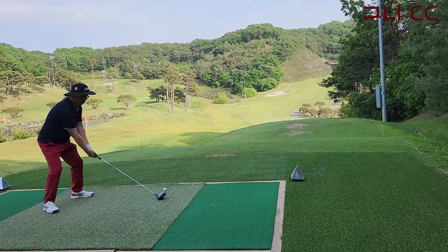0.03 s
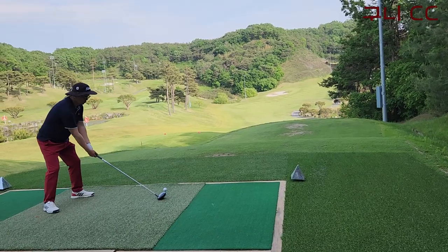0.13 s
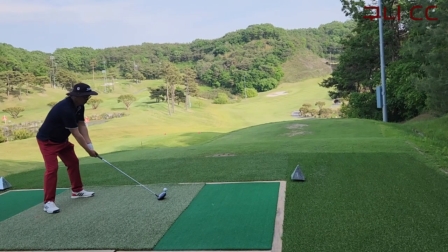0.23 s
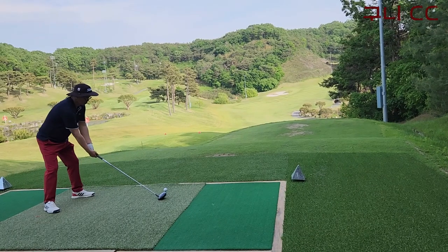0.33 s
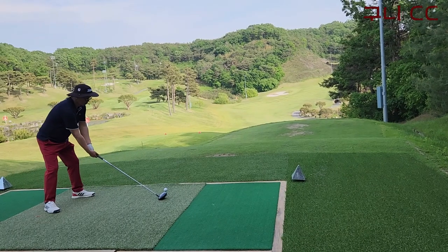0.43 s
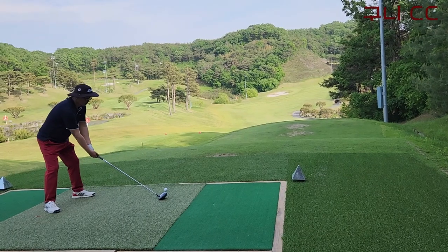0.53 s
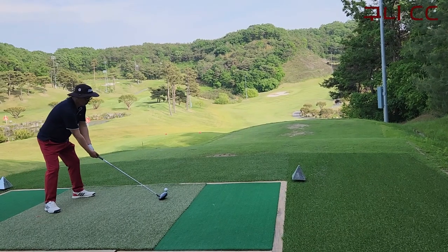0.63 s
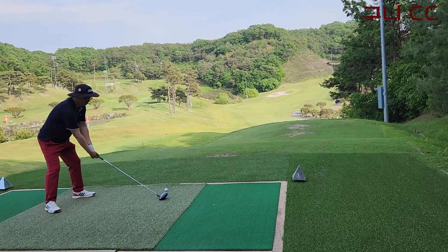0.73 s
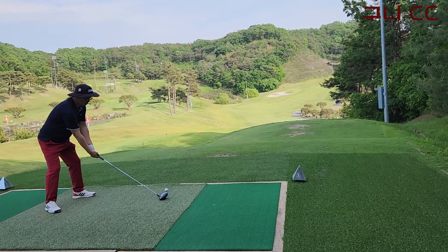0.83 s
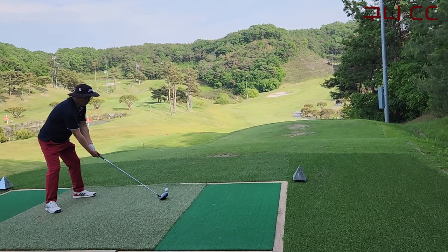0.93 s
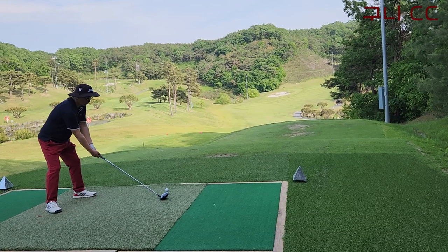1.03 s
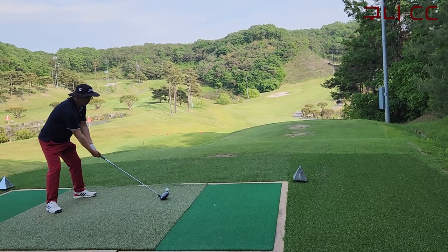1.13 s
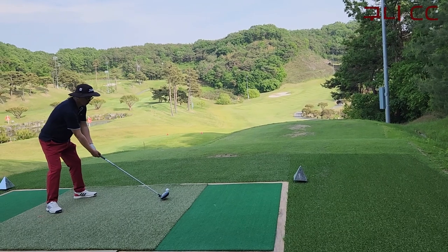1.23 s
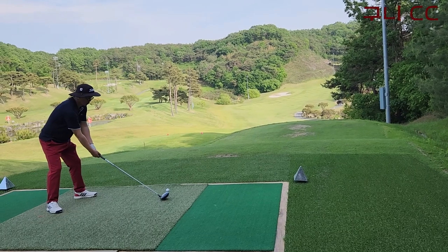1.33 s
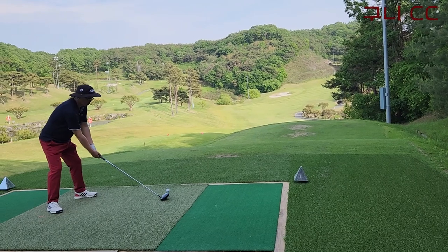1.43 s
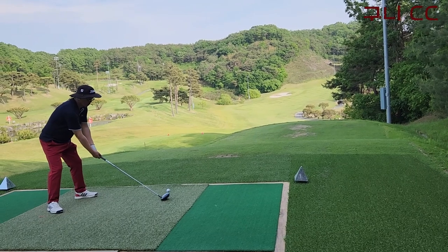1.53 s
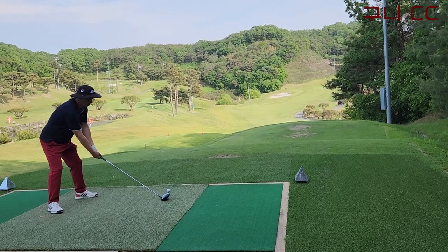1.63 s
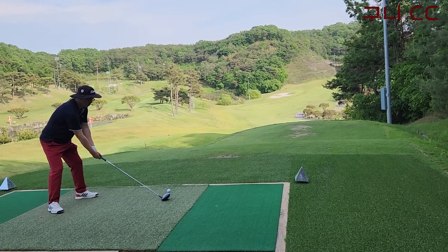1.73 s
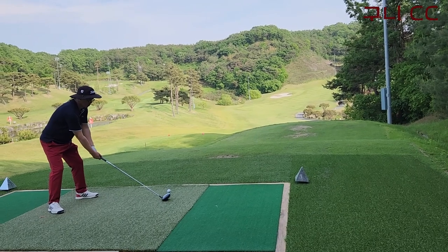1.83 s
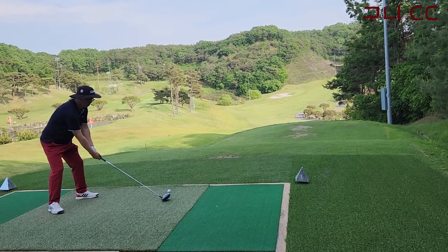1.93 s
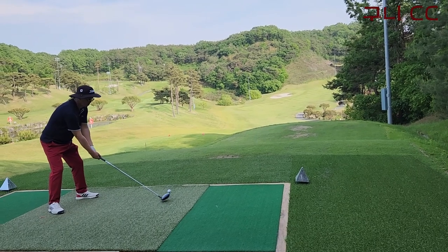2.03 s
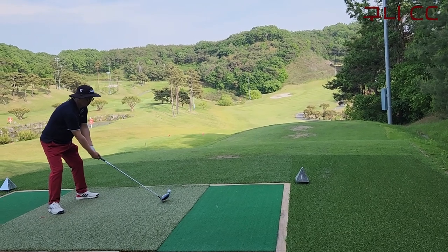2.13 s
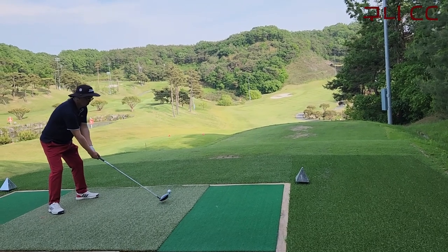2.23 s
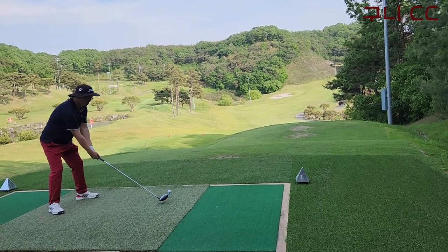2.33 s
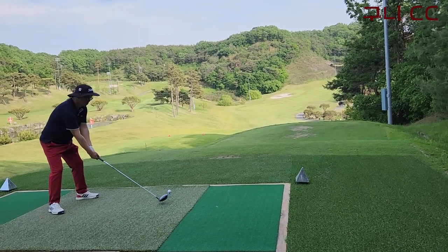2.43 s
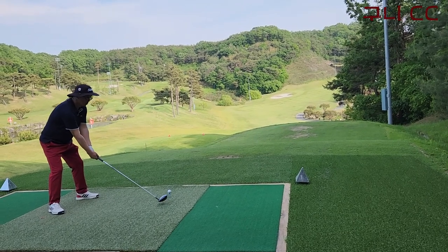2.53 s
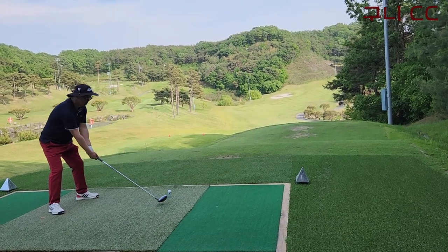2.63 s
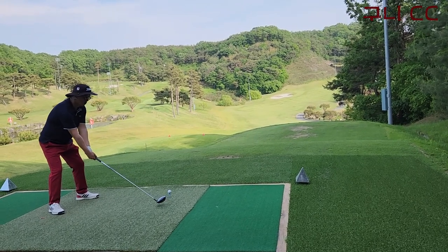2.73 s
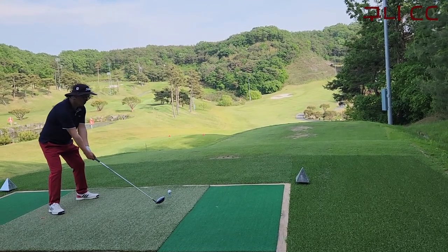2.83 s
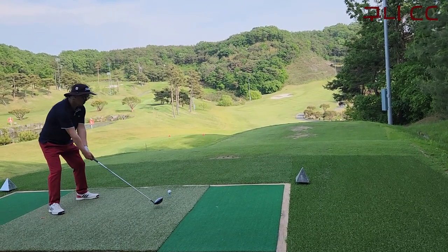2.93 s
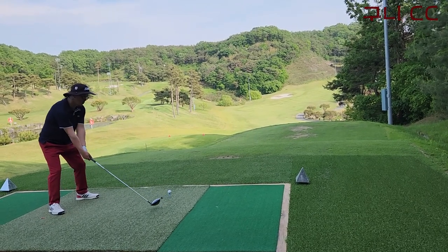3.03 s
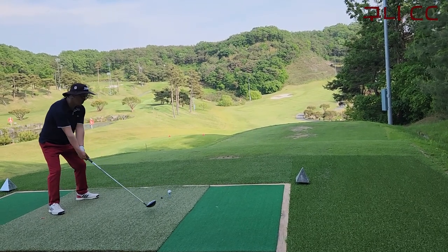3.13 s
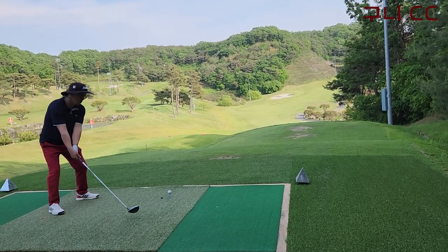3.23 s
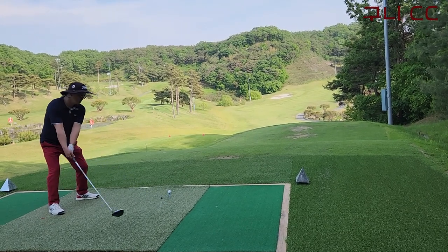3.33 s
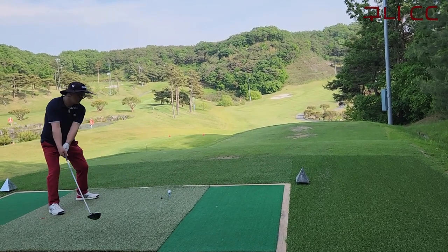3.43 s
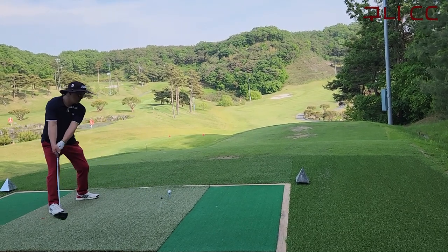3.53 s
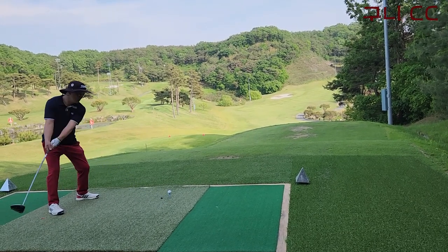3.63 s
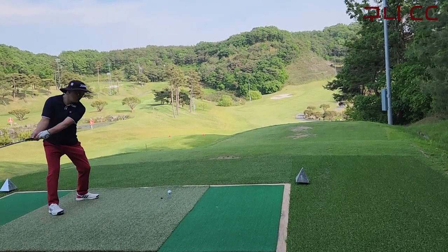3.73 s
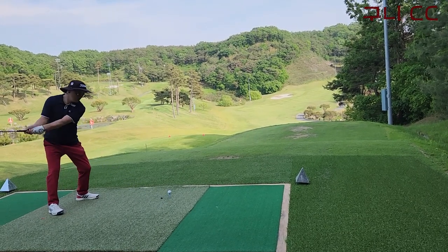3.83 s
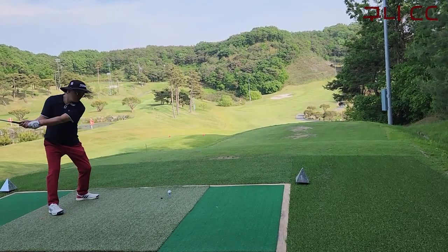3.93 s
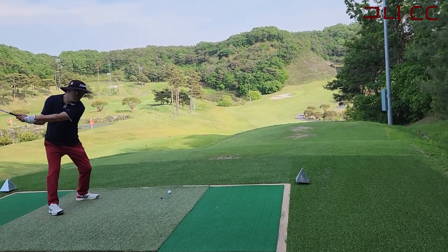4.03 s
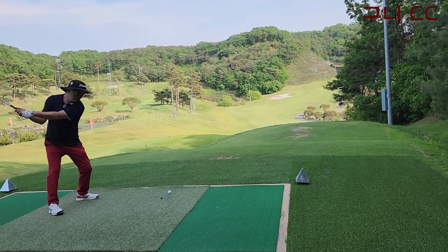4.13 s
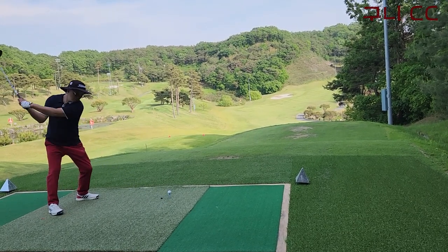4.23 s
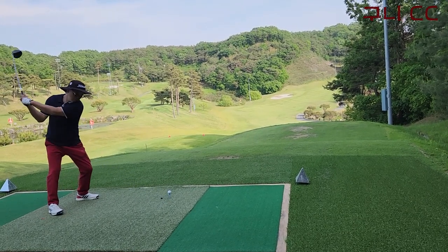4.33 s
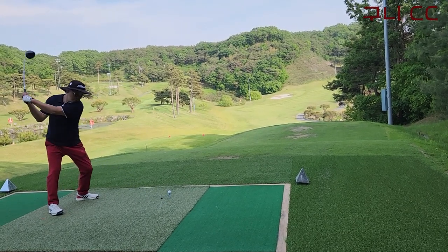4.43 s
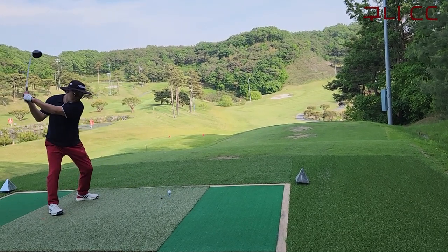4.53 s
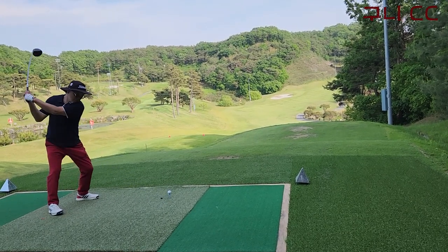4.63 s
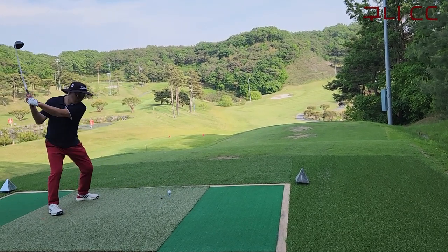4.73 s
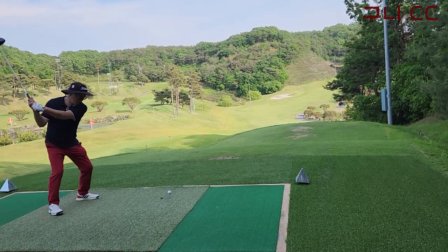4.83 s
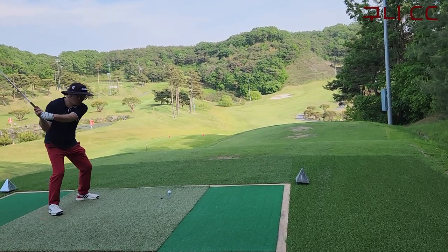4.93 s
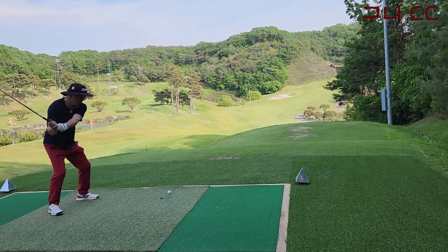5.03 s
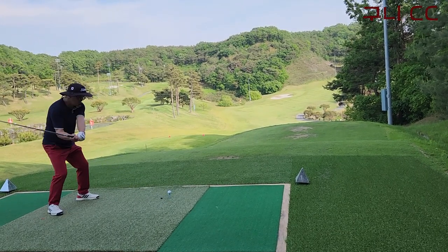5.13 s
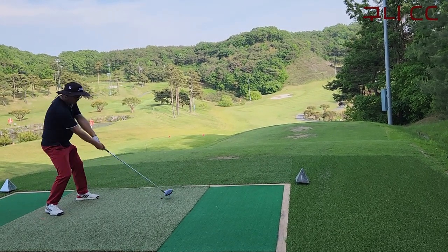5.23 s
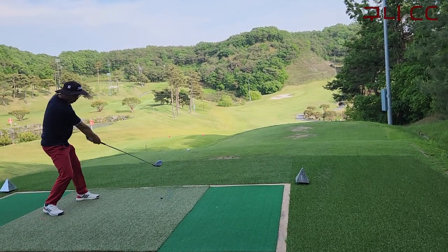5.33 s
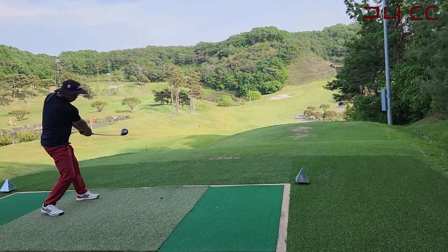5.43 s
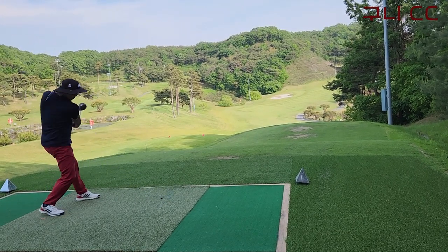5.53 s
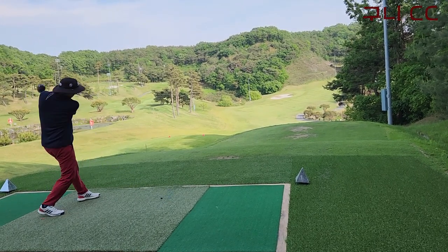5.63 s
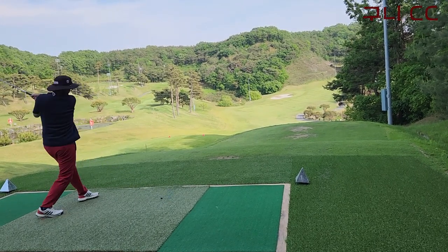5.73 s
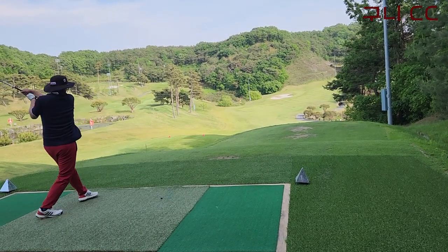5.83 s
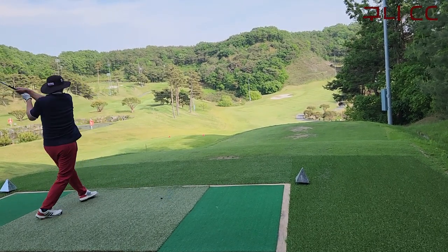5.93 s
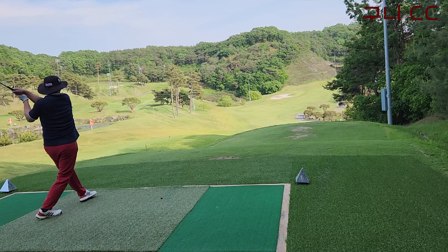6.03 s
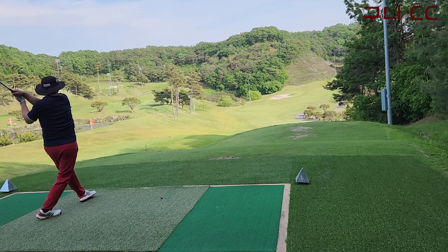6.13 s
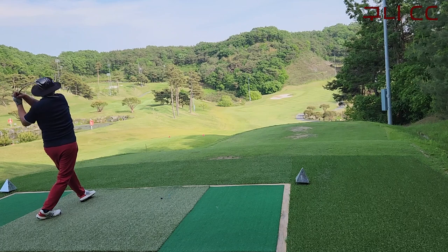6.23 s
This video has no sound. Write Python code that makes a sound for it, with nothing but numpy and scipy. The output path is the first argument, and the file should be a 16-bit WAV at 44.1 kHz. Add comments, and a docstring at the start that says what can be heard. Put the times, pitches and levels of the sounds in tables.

```python
"""Golf drive on a wooded course

A pair of microphones by a practice mat. The club whooshes down and its hollow metal head cracks against
the ball; a slap comes back from close by and the trees scatter a tail. A few soft knocks fall around
the swing. Behind it all, a hiss with a low hum gives way abruptly to quiet open air."""
import sys
import numpy as np
from scipy import signal
from scipy.fft import rfft, irfft, next_fast_len
from scipy.io import wavfile
from scipy.ndimage import uniform_filter1d, minimum_filter1d

SR = 44100
rng = np.random.default_rng(int(sys.argv[2]) if len(sys.argv) > 2 else 0)


def transcribe(signal):
    """Save signal, clipped to [-1, 1], as a 16-bit WAV file at the path in sys.argv[1]."""
    frames = np.atleast_2d(signal).T
    limited = np.clip(frames, -1, 1)
    pcm = np.round(limited * 32767).astype(np.int16)
    wavfile.write(sys.argv[1], SR, pcm)


N = 276727
IMPACT_S = 5.2757


def crack(spray_db=-12, spray_t60=0.1):
    """The squashed ball knocks first, then a spray of dense, short modes bursts out."""
    # The ball's knock. Each row: pitch in Hz, level in dB, t60 in seconds, left over right in dB.
    ball_modes = [(310, -6.5, 0.03, 4.5), (378, -13, .03, 2.5), (530.7, -10.5, 0.045, 7.5)]
    # Each row: frequency in Hz, relative level of the spray in dB.
    spectrum = [(88, -45), (150, -9.5), (547, -20.5), (920, -12), (1450, -19), (1680, -17.5), (2690, -9.5),
                (3190, -4.5), (3410, -12.5), (6900, -13), (8300, -34.5), (10800, -60.5), (18300, -120)]
    # Each row: frequency in Hz, left over right in dB.
    balance = [(60, 0.5), (100, -2), (180, 5.5), (310, -4.5), (540, 0.5), (940, 6), (1640, 4), (2850, -0.5),
               (4940, 0), (8570, 5.5)]
    age = clock() - IMPACT_S
    out = from_db(spray_db) * stereo_noise(spectrum, balance) * struck(age - .0007, spray_t60, .0008)
    for hz, db, t60, side_db in ball_modes:
        out += from_db(db) * pan(side_db) * struck(age, t60, .00066) * np.cos(2 * np.pi * hz * age)
    return out


def head_ring(strength_db=2.5, build_s=.0007):
    """The hollow metal head's modes build up as the ball leaves the face."""
    # Each row: pitch in Hz, relative level in dB, t60 in seconds, left over right in dB.
    modes = [(820, -28.0, 0.139, 7.0), (1262, -25.0, 0.093, 5.0), (1460, -14.0, 0.121, 5.0),
             (1975, -21.0, 0.121, -1.0), (2105, -20.0, 0.134, -3.0), (2360, -23.0, 0.19, -1.0),
             (2460, -23.0, 0.19, 2.0), (2748, -12.0, 0.09, -3.0), (2980, -19.0, 0.133, -4.0),
             (3455, -22.0, 0.105, -9.0), (4035, -27.0, 0.112, 0.0), (4235, -24.0, 0.122, 3.0),
             (4600, -25.0, 0.106, 1.0), (4780, -26.0, 0.13, -0.0), (5262, -24.0, 0.087, 5.0),
             (5562, -23.0, 0.072, 9.0), (5768, -24.0, 0.074, 12.0), (6290, -31.0, 0.162, 8.0),
             (6795, -28.0, 0.078, 7.0), (7760, -40.0, 0.161, 4.0)]
    age, out = clock() - IMPACT_S, 0
    for hz, db, t60, side_db in modes:
        phase = rng.random((2, 1))   # each microphone meets the mode at a phase of its own
        tone = np.sin(2 * np.pi * (hz * age + phase))
        out += from_db(db) * pan(side_db) * struck(age - .0007, t60, build_s) * tone
    return from_db(strength_db) * out


def swish(head_hz=278.6, shaft_hz=6000, up_to_speed_s=5.122, whip_s=0.072, whip_db=18):
    """The thick head sheds slow eddies, the thin shaft fast ones; edges sing just before the ball."""
    # Each row: pitch in Hz, width in Hz, level over the rush in dB, left over right in dB.
    edge_tones = [(2750, 150, -5, -3), (3380, 220, -2, -12), (5060, 50, -4.5, 12), (6550, 70, -15, 14)]
    t = clock()
    swell_db = -328 * np.clip(up_to_speed_s - t, 0, 1)   # these three slopes are in dB per second
    sag_db = -22 * np.clip(t - up_to_speed_s, 0, 1)
    fade_db = -400.5 * np.clip(t - IMPACT_S, 0, 1)
    whip = ramp(IMPACT_S - whip_s, whip_s)   # the wrists release and whip the head through
    whoosh = wavering_tone(head_hz, width_hz=90)
    whoosh += from_db(-16) * wavering_tone(1.8 * head_hz, width_hz=116)
    sizzle = np.array([wavering_tone(shaft_hz, width_hz=2000) for side in range(2)])
    edges = sum(from_db(db) * pan(side_db) * wavering_tone(hz, width_hz, flutter=0.61)
                for hz, width_hz, db, side_db in edge_tones)
    # Each row: frequency in Hz, relative level of the rushing air in dB.
    spectrum = [(240, -32.5), (400, -7.5), (570, -4), (715, -19), (812, -13), (1430, -12.5), (2700, -16),
                (3890, -25.5), (5010, -19.5), (8200, -34.5), (10700, -64.5), (18000, -120)]
    rush = from_db(-48.5 + whip_db * whip) * (stereo_noise(spectrum) + whip * edges)
    club = from_db(-36 + sag_db) * whoosh + from_db(-55.5) * sizzle + rush
    return from_db(swell_db + fade_db) * club


def shaft_whistles(width_s=.014, octaves_per_s=5):
    """Each whistle swells and fades while its pitch climbs with the speed of the shaft."""
    # Each row: loudest moment in seconds, pitch there in Hz, level in dB.
    whistles = [(5.127, 4720, -50), (5.150, 5550, -54), (5.200, 5040, -55)]
    out = 0
    for peak_s, hz, db in whistles:
        age = np.clip(clock() - peak_s, -.1, .1)
        pitch = hz * 2 ** (octaves_per_s * age)
        tone = np.array([wavering_tone(pitch, width_hz=320, flutter=.8) for side in range(2)])
        out += from_db(db) * np.exp(-.5 * (age / width_s) ** 2) * tone
    return out


def echoes(ring, click_db=20, ring_db=-8, slap_s=.053, slap_width_s=.008, tail_s=.045):
    """A smeared slap from close by, then scatter from the trees: a click tinged with the head's ring."""
    # Each row: band centre in Hz, slap in dB, tail in dB, tail t60 in seconds, left over right in dB.
    bands = [(60, -12.5, -14, 0.49, -1.5), (290, -1, -4, .7, 2.5), (560, 4, -3.5, 1, 2),
             (850, -2, -1, .7, 0), (1126, -9.5, -4.5, 0.53, -4), (1540, 3, 1.5, 0.71, -2.5),
             (1780, -9.5, -8, 0.65, -1), (2270, 6, 4, 0.7, -2.5), (2900, -0.5, -0.5, 0.61, -1),
             (3496, -12, -3, 0.45, 0), (4200, -12.5, -9.5, 0.48, 7), (6000, -13.5, -5.5, 0.33, 6.5),
             (8040, -17, -25, .47, 10)]
    sent = from_db(ring_db) * ring + from_db(click_db) * (np.arange(N) == round(IMPACT_S * SR))
    t = np.arange(SR) / SR
    hz = np.arange(SR // 2 + 1)
    scatter = rfft(stereo_noise([(1000, 0)], lag_s=.0002)[:, :SR])
    slap = rms_one(np.exp(-.5 * ((t - slap_s) / slap_width_s) ** 2))
    response = 0
    for centre_hz, slap_db, tail_db, t60, side_db in bands:
        share = at_hz([(band[0], band[0] == centre_hz) for band in bands], hz)
        near = struck(t - tail_s, t60, rise_s=.015)
        far = from_db(-23) * struck(t - tail_s, 2.34 * t60, rise_s=.05)   # distant slopes answer
        tail = rms_one(np.hypot(near, far))
        envelope = np.hypot(from_db(slap_db) * slap, from_db(tail_db) * tail)
        response += irfft(scatter * share, SR) * envelope * pan(side_db) / np.sqrt(SR)
    return signal.fftconvolve(sent, response, axes=1)[:, :N]


def knocks():
    """Dull, quickly damped bumps with one weaker overtone, dead centre."""
    # Each row: start in seconds, level in dB, pitch in Hz, t60 in seconds.
    bumps = [(4.712, -39.5, 302, 0.057), (5.705, -43, 310, 0.041), (5.876, -42, 328, 0.042),
             (6.144, -46.5, 300, 0.065), (6.240, -42.5, 775, 0.032)]
    out = np.zeros(N)
    for start_s, db, hz, t60 in bumps:
        age = clock() - start_s
        body = np.sin(2 * np.pi * hz * age) + from_db(-7) * np.sin(2 * np.pi * 1.8 * hz * age)
        out += from_db(db) * struck(age, t60, rise_s=0.00094) * body
    return out


def hiss_and_hum(hiss_db=-51.5, drone_db=-51):
    """A steady hiss over a low drone and a few humming tones."""
    # Each row of both: frequency in Hz, relative level in dB.
    hiss_spectrum = [(300, -39), (480, -13.5), (800, -9), (1100, -8.5), (1500, -3), (2000, -2.5),
                     (2450, 3.5), (3000, -4), (4200, -11), (5500, -9.5), (6400, -11.5), (7500, -11.5),
                     (9000, -24), (11700, -27), (13000, -70)]
    drone_spectrum = [(20, -20), (40, -16), (55, 0.5), (85, -7), (115, -1.5), (140, -9.5), (175, -3),
                      (235, -7.5), (300, -19.5), (360, -19.5), (410, -13.5), (470, -43.5), (700, -64)]
    # Each row: frequency in Hz, left over right in dB.
    balance = [(60, 1), (100, 1), (180, 2), (310, -3.5), (540, 5.5), (940, 0.5), (1640, -4), (2850, -4.5),
               (4940, 1), (8570, -3)]
    # Each row: pitch in Hz, rms level in dB.
    tones = [(59.2, -58.5), (118.4, -54), (605, -77.5)]
    t = clock()
    hum = sum(from_db(db) * np.sqrt(2) * np.sin(2 * np.pi * (hz * t + rng.random())) for hz, db in tones)
    hiss = from_db(hiss_db) * stereo_noise(hiss_spectrum, balance, lag_s=0.000548)
    drone = from_db(drone_db) * stereo_noise(drone_spectrum, balance)
    return hiss + drone + hum


def open_air(air_db=-52, rumble_db=-50, boom_db=-57, level_drop_db=-3.5):
    """Quiet air over a low rumble; the whole background turns down a few dB shortly after the stroke."""
    # Each row of both: frequency in Hz, relative level in dB.
    air_spectrum = [(150, -39), (250, -15), (290, -10.5), (378, -12), (555, -6), (734, -7.5), (986, -3),
                    (1180, -9.5), (1630, -14.5), (2190, -13), (2390, -15), (2940, -15.5), (4250, -43),
                    (7020, -45), (8500, -63.5), (11000, -94), (18700, -120)]
    rumble_spectrum = [(10, -24), (18, -7), (32, -5.5), (46, 1), (60, -7), (88, -5), (105, -12.5),
                       (125, -22), (155, -20.5), (190, -34), (250, -31), (400, -75)]
    # Each row: frequency in Hz, left over right in dB.
    balance = [(60, 0), (100, 3), (180, 6.5), (310, 1.5), (540, -3), (940, -5), (1640, 0.5), (2850, -3),
               (4940, 2.5), (8570, 13.5)]
    air = from_db(air_db) * stereo_noise(air_spectrum, balance, lag_s=0.001392)
    rumble = from_db(rumble_db) * stereo_noise(rumble_spectrum, balance)
    boom = from_db(boom_db) * wavering_tone(hz=45.9, width_hz=8)
    return from_db(level_drop_db * ramp(start_s=5.73, length_s=0.22)) * (air + rumble + boom)


def stereo_noise(spectrum, balance=((1000, 0),), lag_s=0):
    """Coloured noise of rms 1; its shared part reaches the right microphone later, except in the bass."""
    # Diffuse sound at the pair. Each row: frequency in Hz, likeness of the two sides from 0 to 1.
    likeness = [(60, 0.98), (130, 0.99), (300, 0.83), (600, 0.22), (2500, 0.26), (7000, 0.3)]
    size = next_fast_len(N, real=True)
    hz = np.arange(size // 2 + 1) * SR / size
    white = rfft(rng.standard_normal((3, size)))
    alike = np.clip(at_hz(likeness, hz), 0, 1)
    late = np.exp(-2j * np.pi * hz * lag_s * hz ** 2 / (hz ** 2 + 200 ** 2))
    shared = white[2] * np.array([np.ones_like(late), late])
    both = np.sqrt(alike) * shared + np.sqrt(1 - alike) * white[:2]
    coloured = both * from_db(at_hz(spectrum, hz)) * pan(at_hz(balance, hz))
    return rms_one(irfft(coloured, size)[:, :N])


def wavering_tone(hz, width_hz, flutter=1):
    """A band of noise round a steady or moving pitch, steadier in level when flutter is below 1; rms 1."""
    slow = signal.sosfilt(signal.butter(2, width_hz / 2, fs=SR, output="sos"), rng.standard_normal((2, N)))
    slow *= (np.hypot(*slow) + 1e-9) ** (flutter - 1)
    phase = 2 * np.pi * np.cumsum(hz * np.ones(N)) / SR
    return rms_one(slow[0] * np.cos(phase) + slow[1] * np.sin(phase))


def struck(age, t60, rise_s):
    """Envelope of something hit: a short rise, then a fall of 60 dB every t60 seconds."""
    age = np.clip(age, 0, 3 * t60)
    return (1 - np.exp(-age / rise_s)) * from_db(-60 * age / t60)


def ramp(start_s, length_s):
    """Rises from 0 to 1 and stays there."""
    return np.clip((clock() - start_s) / length_s, 0, 1)


def pan(balance_db):
    """Left and right gains of constant total power."""
    gains = from_db(np.array([[.5], [-.5]]) * balance_db)
    return gains / np.sqrt(np.mean(gains ** 2, axis=0))


def at_hz(points, hz):
    """Read a table on a log-frequency axis."""
    known_hz, values = np.transpose(points)
    return np.interp(np.log(np.maximum(hz, 1)), np.log(known_hz), values)


def from_db(db):
    """Decibels to gain."""
    return 10 ** (np.asarray(db) / 20)


def rms_one(x):
    """Scale to unit rms."""
    return x / np.sqrt(np.mean(x ** 2) + 1e-20)


def clock():
    """Time of every sample in seconds."""
    return np.arange(N) / SR


def scene():
    """The stroke and its echoes, cut above 8 kHz, over knocks and a hiss that gives way to open air."""
    ring = head_ring()
    stroke = swish() + shaft_whistles() + crack() + ring + echoes(ring)
    top_cut = signal.ellip(10, .3, 70, 8000, fs=SR, output="sos")
    foreground = signal.sosfilt(top_cut, stroke) + knocks()
    opened = ramp(start_s=2.0565, length_s=0.0083)
    return foreground + (1 - opened) * hiss_and_hum() + opened * open_air()


def record(dry):
    """A fast limiter holds down the crack, and the top is cut."""
    ceiling, window, cutoff_hz = .9, round(.001 * SR), 9173
    allowed = ceiling / np.maximum(np.abs(dry), ceiling)
    gain = uniform_filter1d(minimum_filter1d(allowed, window, axis=1), window, axis=1)
    return signal.sosfilt(signal.butter(8, cutoff_hz, fs=SR, output="sos"), gain * dry)


dry = scene()
out = record(dry)
transcribe(out)
```